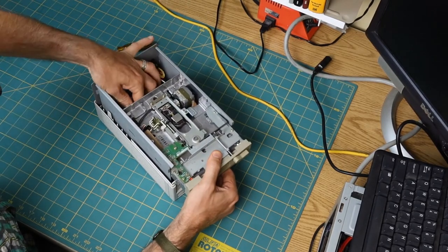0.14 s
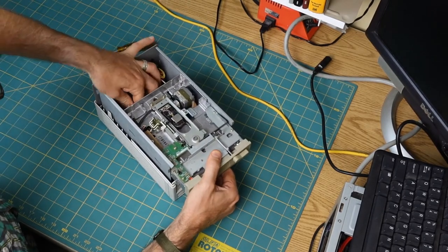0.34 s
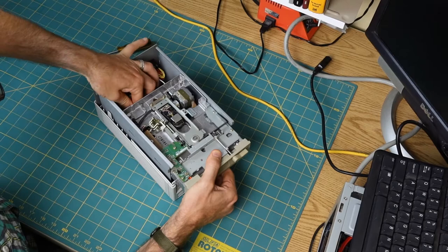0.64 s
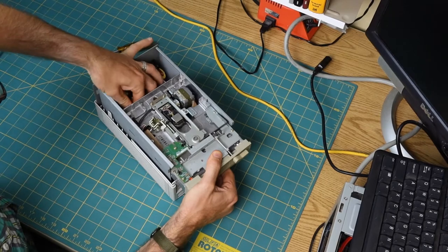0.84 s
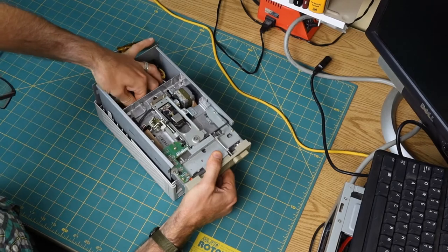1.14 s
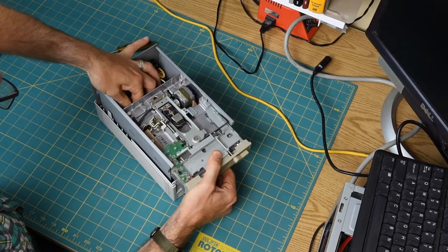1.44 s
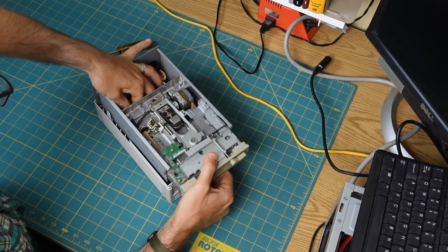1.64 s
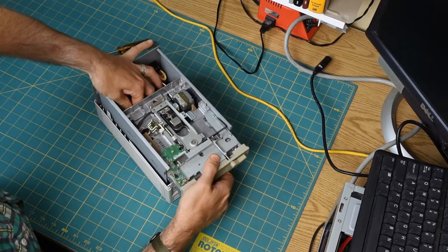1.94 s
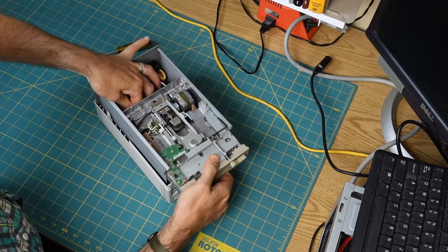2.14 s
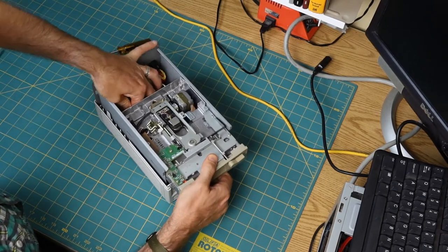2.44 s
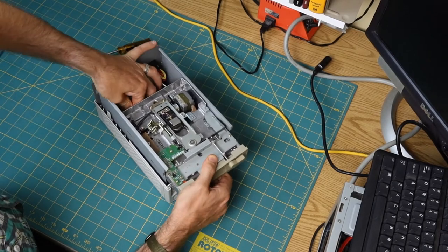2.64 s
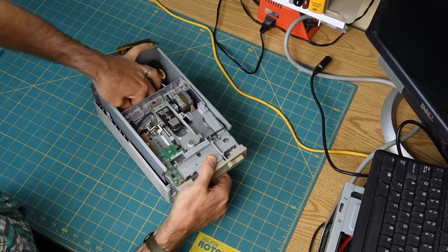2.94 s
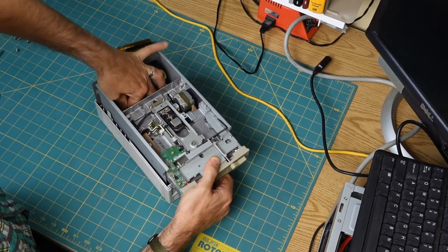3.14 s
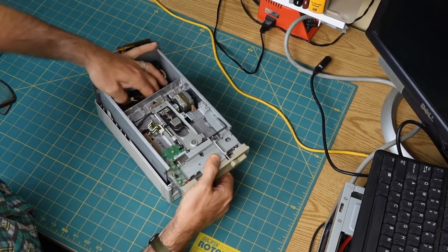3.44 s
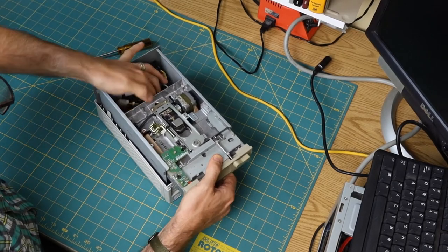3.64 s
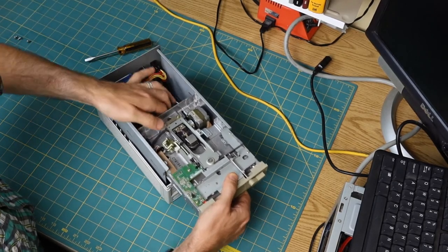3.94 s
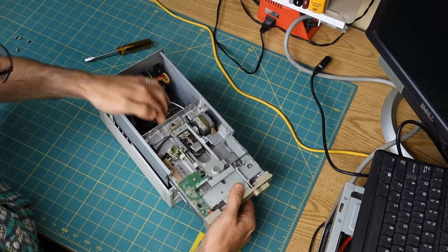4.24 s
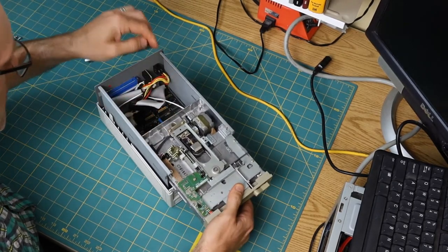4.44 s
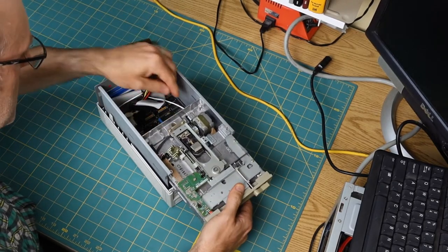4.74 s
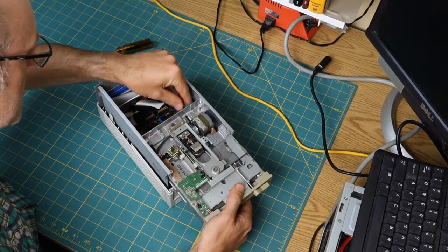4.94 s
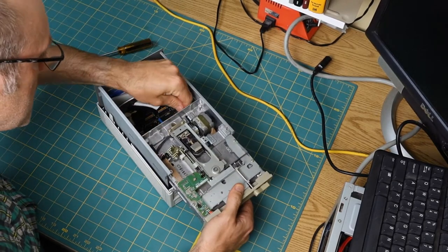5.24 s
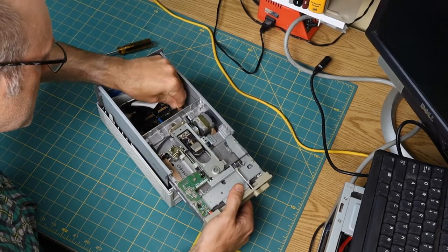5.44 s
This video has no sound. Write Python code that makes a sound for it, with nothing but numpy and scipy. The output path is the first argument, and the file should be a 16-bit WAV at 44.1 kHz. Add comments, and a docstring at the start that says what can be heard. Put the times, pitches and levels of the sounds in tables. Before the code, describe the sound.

A small, quiet room with soft air noise and a faint low hum, heard close in mono. Hands holding a thin metal case make a low, uneven rumble. From 0 to 1 second there are only faint ticks and taps; a clearer click comes at 1.1, then dull hollow knocks with low thumps around 1.7 to 1.9. Light clicks follow, with another modest knock at 2.5, then a lull. At about 3.1 two loud, bright clacks land almost together, ringing the sheet metal briefly while the desk booms. Handling rumble rises; a sharp clack at 3.65 is trailed by small hollow rattles. The drive slides with a short, grainy scrape and fine hiss until about 4.2, ending in a heavy, hollow clunk with a deep thud and a small rebound at 4.3. Near-quiet follows, until light metal taps and finger rubs from 5.15 to 5.5.

```python
"""On a desk in a small room, a disk drive is worked loose inside a sheet-metal case.
It ticks and knocks against its bay, breaks free with a double clack, slides out and drops back on the case.
Blows ring the case with decaying sines and noise, and thuds make the desk boom with low sines.
Scraping metal and rubbing fingers are grainy noise through the case's resonances.
Under it all lie rumble from the hands, soft air noise and a low hum."""
import sys
import numpy as np
from scipy import signal
from scipy.io import wavfile
from scipy.ndimage import map_coordinates

SR = 44100
rng = np.random.default_rng(int(sys.argv[2]) if len(sys.argv) > 2 else 0)


def wav_record(signal):
    """Record a signal, one row per channel, as 16-bit PCM in the file named by sys.argv[1]."""
    frames = np.transpose(np.atleast_2d(signal))
    bounded = np.clip(frames, -1, 1)
    # unit amplitude maps onto the largest positive 16-bit level
    quanta = np.round(bounded * 32767).astype(np.int16)
    wavfile.write(sys.argv[1], SR, quanta)


N = 246519
TIME = np.arange(N) / SR
AGE = TIME[:SR // 2]   # seconds since a blow
# 25 neighbouring frequency bands, from low to high
EDGES = np.geomspace(18, 17000, 26)
CENTRES = np.sqrt(EDGES[1:] * EDGES[:-1])
BANK = [signal.butter(2, pair, "band", fs=SR, output="sos") for pair in zip(EDGES, EDGES[1:])]


def from_db(db):
    """Decibels to gain."""
    return 10 ** (np.asarray(db) / 20)


def rms_one(x):
    """Scale to an rms (average strength) of 1."""
    return x / np.sqrt(np.mean(x ** 2) + 1e-20)


def level(curve):
    """Gain over time from rows of (seconds, dB)."""
    return from_db(np.interp(TIME, *np.transpose(curve)))


def at_hz(points, hz):
    """Read a table between its rows, on a log-frequency axis."""
    freqs, values = np.transpose(points)
    return np.interp(np.log(hz), np.log(freqs), values)


def add(track, s, sound):
    """Mix a sound into a track at s seconds."""
    start = max(round(s * SR), 0)
    track[start:start + len(sound)] += sound[:N - start]


def dying(t60, hold=0):
    """Envelope that stays level for hold seconds, then falls 60 dB in t60 seconds."""
    return np.exp(-np.log(1000) * np.maximum(AGE - hold, 0) / t60)


def swell(start, length, attack_s, release_s):
    """Gain of one movement: it rises, holds until its length is over and dies away."""
    rise = np.clip((TIME - start) / attack_s, 0, 1)
    return rise * np.exp(-np.maximum(TIME - start - length, 0) / release_s)


def wander(per_s):
    """A random value with a spread near 1: straight lines between per_s fresh points a second."""
    knots = np.arange(0, TIME[-1] + 1, 1 / per_s)
    return np.interp(TIME, knots, rng.standard_normal(len(knots)))


def coloured(spectrum, flicker_db):
    """Noise in bands, each flickering in level by itself; rms 1."""
    white = rng.standard_normal((2, N))
    out = np.zeros(N)
    for k, (sos, hz) in enumerate(zip(BANK, CENTRES)):
        gain = from_db(at_hz(spectrum, hz) + flicker_db * wander(13))
        out += gain * signal.sosfilt(sos, white[k % 2])
    return rms_one(out)


# Still air of the room. Each row: frequency in Hz, relative level in dB per Hz.
AIR_COLOUR = [(20, -1), (130, -22.5), (280, -24.5), (500, -32), (1200, -38.5), (7000, -51.5), (16000, -59)]
AIR_DB = -53
# Electrical hum. Each row: frequency in Hz, rms level in dB.
HUM_TONES = [(120, -61.5), (1180, -78.5)]


def room_tone():
    """Still air is soft coloured noise; the faint electrical hum is a few steady sines."""
    hum = sum(from_db(db) * np.sqrt(2) * np.sin(2 * np.pi * hz * TIME) for hz, db in HUM_TONES)
    return hum + from_db(AIR_DB) * coloured(AIR_COLOUR, flicker_db=6.0)


# Ringing tones of drive and case; the knocks play them too.
# Each row: frequency in Hz, relative level in dB, time to fall 60 dB in seconds.
CASE_MODES = [(275.7, -14.5, 0.16), (318, -11.5, 0.064), (456, -5, 0.12), (619, 0, 0.065),
              (980, -11.5, 0.089), (1430, -17.5, 0.061), (1628, -26.5, .13), (1907, -16, 0.12),
              (2337, -9, 0.077), (2660, -15.5, 0.11), (2917, -10.5, 0.03), (3322, -15, 0.074),
              (3577, -16.5, 0.16), (4270, -15, 0.11), (4750, -17, 0.13), (5360, -19.5, 0.076),
              (6500, -27.5, 0.12), (10200, -35.5, 0.16)]


def case_resonance(x, width_hz, ring_db, shift_db, bend_s=0.0015):
    """Each case mode lifts a steady sound, swelling and bending as the point of contact travels; rms 1."""
    radius = np.exp(-np.pi * width_hz / SR)
    out = x.copy()
    for hz, db, _ in CASE_MODES:
        poles = [1, -2 * radius * np.cos(2 * np.pi * hz / SR), radius ** 2]
        # half the table's dB: steady rubbing brings out the modes more evenly than a blow
        drive = x * from_db(db / 2 + ring_db + shift_db * wander(13))
        out += signal.lfilter([1, 0, -1], poles, drive) * (1 - radius ** 2) / 2
    # reading a little early or late bends the pitch
    read_at = (TIME + bend_s * wander(10)) * SR
    return rms_one(map_coordinates(out, [read_at], order=3, mode="mirror"))


def friction(gain, colour, catches_per_s, spread_db, t60, smooth_share):
    """Surfaces catch and let go at random; each catch is a brief burst of noise in the case."""
    strengths = from_db(spread_db * np.minimum(rng.exponential(1, N), 3))
    catches = (rng.random(N) < catches_per_s / SR) * strengths
    power = np.maximum(signal.fftconvolve(catches ** 2, dying(t60) ** 2)[:N], 0)
    share = np.clip(smooth_share, 0, 1)
    grain = np.sqrt(share + (1 - share) * power / power.mean())
    rough = grain * coloured(colour, flicker_db=2.5)
    return gain * case_resonance(rough, width_hz=50, ring_db=10.0, shift_db=5.5)


# How firmly the hands work the case. Each row: time in seconds, base level in dB.
GRIP = [(0.0, -47.5), (0.72, -47.5), (1.74, -43.5), (2.99, -45.5), (3.22, -36), (4.16, -41.5), (4.93, -62),
        (5.59, -44.5)]
# Finger strokes on case and cables. Each row: start in seconds, length in seconds, rub level in dB.
STROKES = [(0.874, 0.063, -62), (1.278, 0.034, -55.5), (3.396, 0.043, -48.5), (5.135, 0.12, -59),
           (5.35, 0.11, -47)]
STROKE_ATTACK_S, STROKE_RELEASE_S = 0.0087, 0.019
# Tone of the rubbing. Each row: frequency in Hz, relative level in dB per Hz.
RUB_COLOUR = [(120, -24), (250, -12), (480, -1.5), (680, -11), (850, -8), (1600, -13.5), (4100, -17),
              (16000, -28.5)]
# Tone of the rocking. Each row: frequency in Hz, relative level in dB per Hz.
RUMBLE_COLOUR = [(20, 4.5), (33, 1), (54, -23.5), (81, -28), (105, -9), (150, -13), (185, -41.5),
                 (400, -63.5)]
RUMBLE_DB, GRIP_RUB_DB = 2, -23.5   # rumble and resting rub, compared with the grip
STROKE_PUSH_DB = 11   # rumble that a stroke adds, compared with its rub


def fingers():
    """Skin rubs and the case rocks on the desk as long as the hands grip, and more with each stroke."""
    strokes = sum(from_db(db) * swell(s, length, STROKE_ATTACK_S, STROKE_RELEASE_S)
                  for s, length, db in STROKES)
    grip = level(GRIP)
    rub_gain = strokes + from_db(GRIP_RUB_DB) * grip
    rub = friction(rub_gain, RUB_COLOUR, catches_per_s=130, spread_db=3.0, t60=0.06, smooth_share=0.25)
    rocking = from_db(RUMBLE_DB) * grip + from_db(STROKE_PUSH_DB) * strokes
    return rub + rocking * coloured(RUMBLE_COLOUR, flicker_db=4.5)


# The countless crowded panel modes; the knocks read both tables too.
# Each row: frequency in Hz, relative level in dB per Hz.
PANEL = [(100, -9), (330, 4), (700, 1), (1100, -2), (1500, 1.5), (2700, 1), (4200, -2), (6000, -6.5),
         (8200, -8), (10500, -17.5), (15500, -19.5)]
# Each row: frequency in Hz, time to fall 60 dB in seconds.
PANEL_T60 = [(200, 0.23), (700, 0.18), (1800, 0.12), (13000, 0.099)]


def band_gains(spectrum):
    """Rms of each band for a spectrum given per Hz; total power 1."""
    gains = from_db(at_hz(spectrum, CENTRES)) * np.sqrt(np.diff(EDGES))
    return gains / np.linalg.norm(gains)


def panel_ring(hold, crack_db, crack_s, tail_db, room_t60):
    """Crowded panel modes as noise bands: a crack, a short hold, a fast decay and a faint room tail."""
    white = rng.standard_normal((2, len(AGE)))
    bands = []
    crack = 1 + from_db(crack_db) * np.exp(-AGE / crack_s)
    tail = from_db(tail_db) * dying(room_t60)
    for k, (sos, hz) in enumerate(zip(BANK, CENTRES)):
        envelope = crack * dying(at_hz(PANEL_T60, hz), hold) + tail
        band = signal.sosfilt(sos, white[k % 2] * envelope)
        # give every band the strength of its envelope
        bands.append(band * np.linalg.norm(envelope) / np.linalg.norm(band))
    return np.array(bands) * band_gains(PANEL)[:, None]


# Metal contacts. Each row: start in seconds, base clack level in dB, hollow body in dB compared with
# the clack, sharp edge in dB compared with the clack, ring of the struck part in Hz.
KNOCKS = [(0.028, -52.5, 3.5, -24, 1840), (0.088, -59.5, 5.5, -26, 2780), (0.365, -60, 6, -27, 2500),
          (0.411, -55.5, 9, -9, 3940), (0.488, -66.5, 13.5, -7, 2760), (0.548, -72, 15.5, -39, 1380),
          (0.811, -60.5, 1, -4, 4660), (0.921, -66.5, 15, -31, 736), (0.979, -60.5, 5.5, -10, 5540),
          (1.094, -39, 0.5, -34, 2610), (1.292, -63.5, 11.5, -12, 3740), (1.437, -49.5, 5, -22, 2635),
          (1.509, -55, 1.5, -49, 2000), (1.551, -53, -2, -9, 3300), (1.672, -33.5, 7, -23.5, 1154),
          (1.79, -55.5, 2.5, -20, 1900), (1.814, -33.5, 2, -23.5, 2240), (1.871, -34.5, 5.5, -19, 2340),
          (2.059, -56, 4.5, -18, 1803), (2.113, -59.5, 5.5, -20, 1669), (2.154, -56, 3, -31, 2050),
          (2.338, -51, 1.5, -23, 2050), (2.371, -70, 8, -31, 2120), (2.506, -34.5, 1.5, -15, 1514),
          (3.08, -42, 12.5, -12, 1090), (3.097, -20.5, -0.5, -8, 3020), (3.139, -13, -4.5, -13, 2350),
          (3.176, -32.5, -2.5, -7.5, 3320), (3.355, -56, 8, -8.5, 4297), (3.387, -56, 14, -5, 2030),
          (3.502, -58, 12, -19, 690), (3.563, -55.5, 11, -19.5, 2030), (3.654, -17.5, -8.5, -11.5, 2352),
          (3.702, -37.5, 8, 0.5, 4200), (3.745, -37, 8, -14, 2270), (3.778, -32.5, -4, -19, 2340),
          (4.029, -51, 13, -18, 1010), (4.227, -19, -2, -11, 2583), (4.302, -40.5, 10.5, -38, 1420),
          (5.167, -45.5, 3.5, -18.5, 1216), (5.202, -50, 6.5, -14.5, 2160), (5.372, -41, 6, -8.5, 2160),
          (5.401, -50.5, 11.5, -5, 5550), (5.468, -53.5, 0, -10, 5940)]
# a blow louder than HARD_DB rebounds twice, weaker each time
HARD_DB, REBOUND_S, REBOUND_LOSS_DB = -26, 0.01, 8.5


def contacts(count=3):
    """Every knock, with the rebounds of the hard ones."""
    return [(s + k * REBOUND_S, db - k * REBOUND_LOSS_DB, body_db, edge_db, ring_hz)
            for s, db, body_db, edge_db, ring_hz in KNOCKS
            for k in range(count if db > HARD_DB else 1)]


def knocks(panel_db, modes_db, spot_db, local_db, local_t60, scatter_db,
           usual_body_db, usual_edge_db, rise_s, count=36):
    """Every contact rings the same case; where and how hard it lands sets its colour."""
    out = np.zeros(N)
    for s, clack_db, body_db, edge_db, ring_hz in contacts():
        # more body lifts the lows, more edge lifts the highs
        body, edge = body_db - usual_body_db, edge_db - usual_edge_db
        colour = [(620, body), (1000, 0.8 * body), (2000, 0.006), (3200, 0.0074), (9000, edge)]
        bands = panel_ring(hold=0.0085, crack_db=3.0, crack_s=0.00025, tail_db=-26.0, room_t60=0.4)
        panels = from_db(at_hz(colour, CENTRES)) @ bands
        # each spot of the sheet metal also favours a scatter of modes of its own
        spot_hz = np.geomspace(700, 13000, count) * np.exp(0.055 * rng.standard_normal(count))
        spot_level = at_hz(PANEL, spot_hz) + spot_db + 10 * np.log10(spot_hz / spot_hz.mean())
        spot = np.transpose([spot_hz, spot_level, at_hz(PANEL_T60, spot_hz)])
        hz, db, t60 = np.vstack([CASE_MODES, spot]).T
        mode_db = db + at_hz(colour, hz) + scatter_db * rng.standard_normal(len(hz))
        strengths = from_db(mode_db) * rng.choice([-1, 1], len(hz))
        ring = strengths @ (np.sin(2 * np.pi * hz[:, None] * AGE) * dying(t60[:, None]))
        local = np.sin(2 * np.pi * ring_hz * AGE) * dying(local_t60)
        blow = from_db(panel_db) * panels + from_db(modes_db) * ring + from_db(local_db) * local
        add(out, s, from_db(clack_db) * blow * (1 - np.exp(-AGE / rise_s)))
    return out


# The weight of the case lands on the desk. Each row: start in seconds, base level in dB.
THUDS = [(0.45, -33), (1.096, -30), (1.294, -36), (1.67, -18.5), (1.816, -24.5), (1.871, -16.5),
         (2.507, -24.5), (3.081, -10), (3.138, -7.5), (3.747, -20), (4.225, -5), (5.399, -23.5),
         (5.446, -31)]
# Boom of desk and room.
# Each row: frequency in Hz, relative level in dB, time to fall 60 dB in seconds.
DESK_MODES = [(37.53, -8, 0.24), (57.67, -6, 0.3), (69, -18.5, 0.61), (102.76, 1, 0.37), (130, 0, 0.084),
              (150.1, -2, 0.32), (202.3, -13.5, 0.19)]


def thumps(swell_s):
    """Each thud carries through to desk and room, whose low modes take a moment to build up."""
    boom = np.zeros(len(AGE))
    for k, (hz, db, t60) in enumerate(DESK_MODES):
        boom += (-1) ** k * from_db(db) * np.sin(2 * np.pi * hz * AGE) * dying(t60)
    boom *= 1 - np.exp(-AGE / swell_s)
    out = np.zeros(N)
    for s, db in THUDS:
        add(out, s, from_db(db) * boom)
    return out


# Thin bright ticks, some alone and some as the sharp ring of a blow.
# Each row: start in seconds, pitch in Hz, base level in dB.
TICKS = [(0.786, 5600, -61), (0.955, 5140, -64), (1.095, 2954, -41.5), (1.386, 5240, -60),
         (1.675, 3440, -51), (2.194, 8500, -61), (2.225, 9100, -60), (3.139, 3339, -16.5),
         (3.176, 10140, -37), (4.908, 3973, -62.5), (5.33, 2240, -47)]


def ticks(octaves, snap_t60, snap_db, ring_db, ring_t60):
    """A snap of noise with a thin ring: a narrow noise burst and a sine at the same pitch."""
    out = np.zeros(N)
    for s, hz, db in TICKS:
        limits = hz * 2 ** (octaves * np.array([-0.5, 0.5]))
        thin = signal.butter(2, limits, "band", fs=SR, output="sos")
        snap = signal.sosfilt(thin, rng.standard_normal(len(AGE)) * dying(snap_t60))
        ring = np.sin(2 * np.pi * hz * AGE) * dying(ring_t60)
        add(out, s, from_db(db + snap_db) * snap + from_db(db + ring_db) * ring)
    return out


# Low hollow rings of drive and case, most under the blows.
# Each row: start in seconds, pitch in Hz, base level in dB.
HOLLOW_RINGS = [(1.671, 971, -32.5), (1.675, 340, -19), (1.874, 355, -16.5), (2.076, 710, -35.5),
                (3.656, 625, -23.5), (3.702, 576, -22), (3.746, 622, -24), (4.028, 311, -24),
                (4.226, 335, -9), (4.303, 679, -20.5), (5.373, 610, -21.5)]


def hollow_rings(length_s, jitter, overtone_db, t60, count=6):
    """A few quick, nearly even pulses, each a dying sine and its octave, make one hollow ring."""
    out = np.zeros(N)
    for s, hz, db in HOLLOW_RINGS:
        octave = from_db(overtone_db) * np.sin(4 * np.pi * hz * AGE)
        pulse = (np.sin(2 * np.pi * hz * AGE) + octave) * dying(t60)
        # about one pulse per cycle of the pitch, each weaker as time passes
        for delay in np.cumsum(1 + jitter * rng.standard_normal(count)) / hz:
            add(out, s + delay - 1 / hz, from_db(db) * np.exp(-delay / length_s) * pulse / 2)
    return out


# The drive slides along its bay.
# Each row: time in seconds, base level of the grinding in dB, base level of the fine hiss in dB.
SLIDE = [(3.814, -40, -55.5), (3.867, -40, -54), (3.91, -43, -48.5), (4.0, -37, -46), (4.025, -40, -48),
         (4.06, -45, -63), (4.212, -47, -61.5)]
SLIDE_START_S, SLIDE_ATTACK_S = 3.535, 0.16
# Tone of the grinding. Each row: frequency in Hz, relative level in dB per Hz.
GRIND_COLOUR = [(120, -24), (460, -0.5), (900, -3), (2700, -11), (4500, -21), (16000, -73)]
# Tone of the fine hiss. Each row: frequency in Hz, relative level in dB per Hz.
HISS_COLOUR = [(400, -28.5), (1500, -6.5), (4000, 2.5), (9000, -2.5), (16000, -11)]
HISS_GRAIN_DB, HISS_GRAINS_PER_S = 1, 1500   # unevenness of the sliding metal


def slide(grind_db, hiss_db):
    """Edges grind on the sheet metal with a fine, ringing grit; each follows its own level curve."""
    s, grinding, hissing = np.transpose(SLIDE)
    moving = swell(SLIDE_START_S, s[-1] - SLIDE_START_S, SLIDE_ATTACK_S, release_s=0.027)
    pressure = moving * level(np.c_[s, grinding])
    hiss_gain = moving * level(np.c_[s, hissing])
    # the movement counts twice here, so the grinding rises and fades more steeply than the hiss
    grind = friction(moving * pressure, GRIND_COLOUR, catches_per_s=81, spread_db=1.5,
                     t60=0.042, smooth_share=0.67)
    grit = from_db(HISS_GRAIN_DB * wander(HISS_GRAINS_PER_S)) * coloured(HISS_COLOUR, flicker_db=2.5)
    hiss = hiss_gain * case_resonance(grit, width_hz=25, ring_db=7, shift_db=5.5)
    return from_db(grind_db) * grind + from_db(hiss_db) * hiss


def scene():
    """Room, hands, blows and sliding, summed into one channel."""
    out = room_tone() + fingers()
    out += knocks(panel_db=0, modes_db=0.0, spot_db=-10.5, local_db=3.5, local_t60=0.067, scatter_db=1.0,
                  usual_body_db=-3.5, usual_edge_db=-12.0, rise_s=0.001806)
    out += thumps(swell_s=0.021)
    out += ticks(octaves=0.84, snap_t60=0.056, snap_db=7, ring_db=-9.5, ring_t60=0.2)
    out += hollow_rings(length_s=0.022, jitter=0.23, overtone_db=-15.0, t60=0.038)
    out += slide(grind_db=-0.5, hiss_db=3.5)
    return out[None]


CUTOFF_HZ = 16000


def record(dry):
    """The loudest peaks are rounded and the top is cut steeply."""
    rounded = np.tanh(dry)
    return signal.sosfilt(signal.ellip(10, 0.2, 80, CUTOFF_HZ, fs=SR, output="sos"), rounded)


dry = scene()
out = record(dry)
wav_record(out)
```